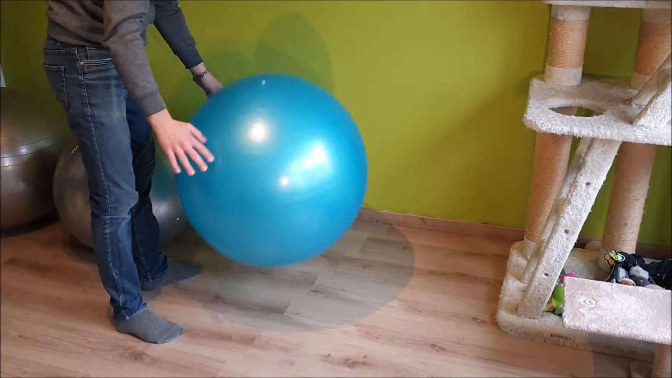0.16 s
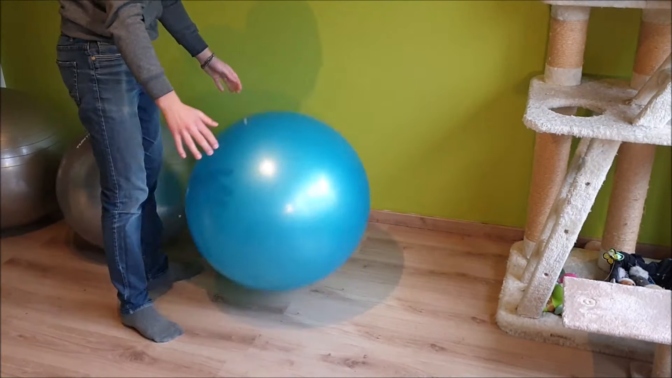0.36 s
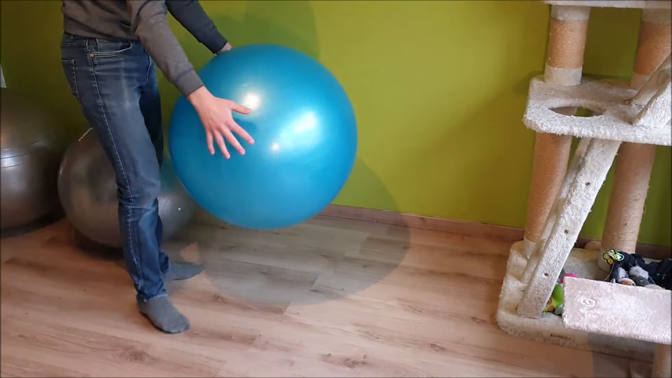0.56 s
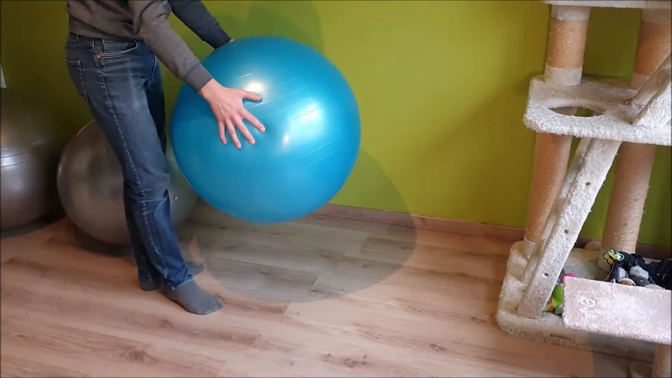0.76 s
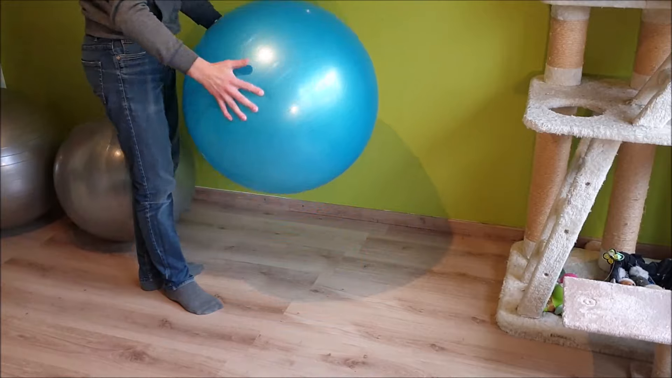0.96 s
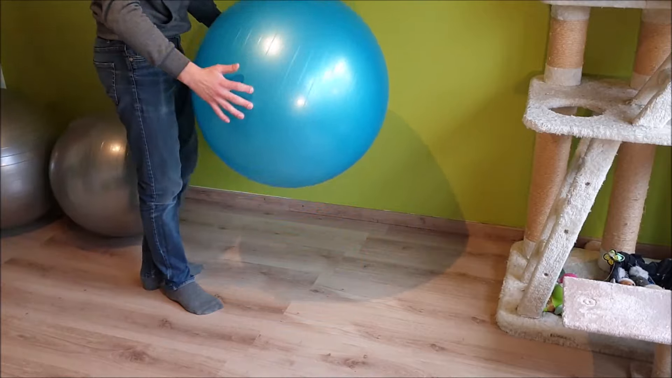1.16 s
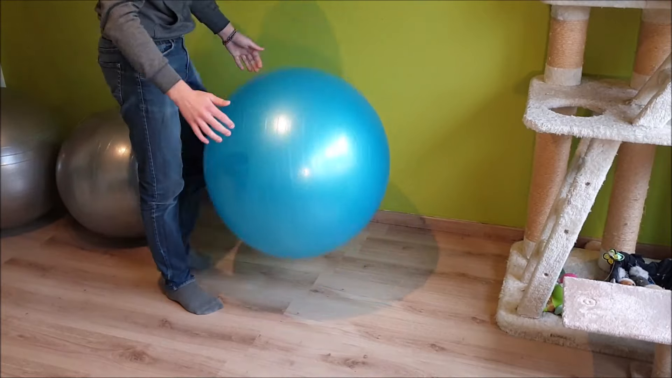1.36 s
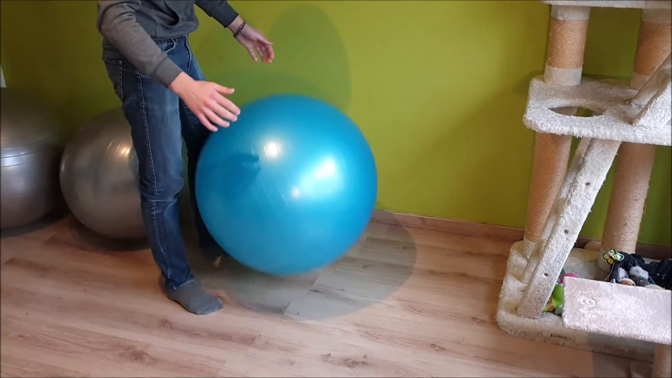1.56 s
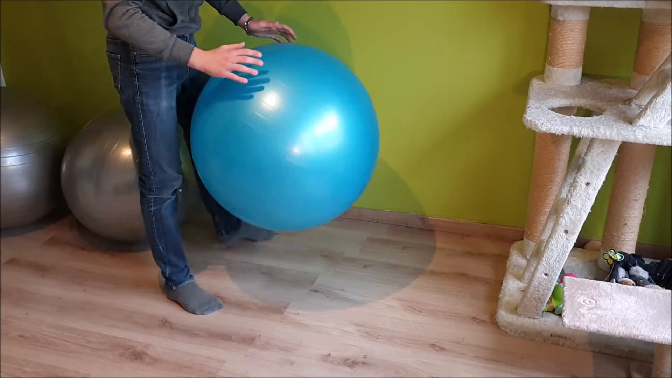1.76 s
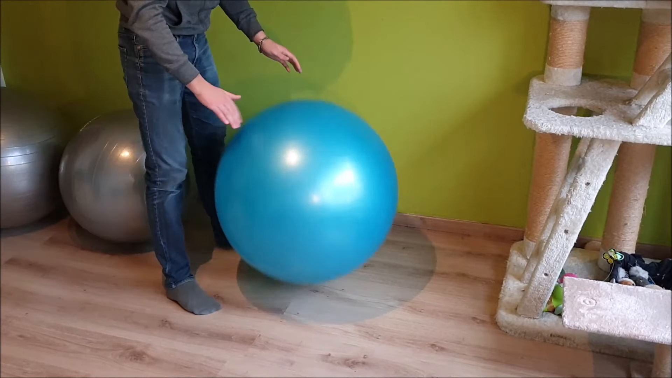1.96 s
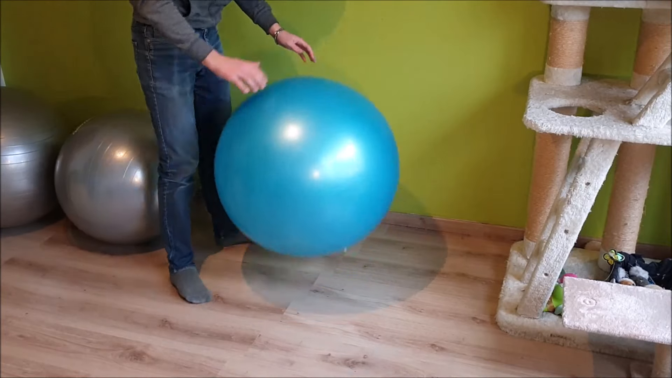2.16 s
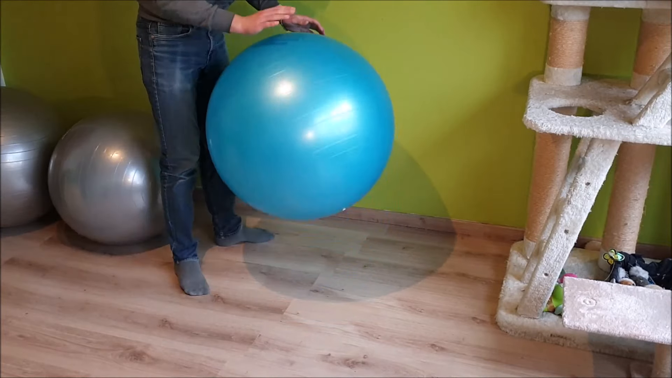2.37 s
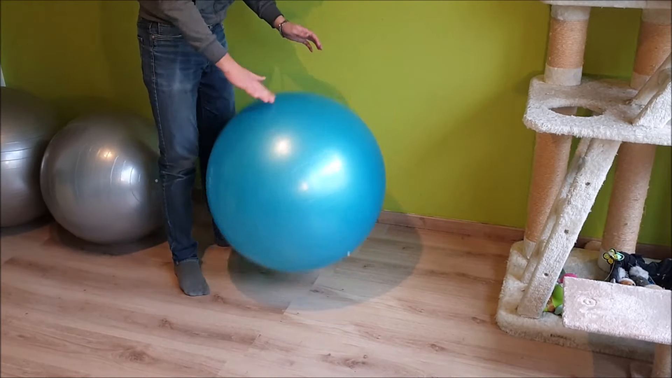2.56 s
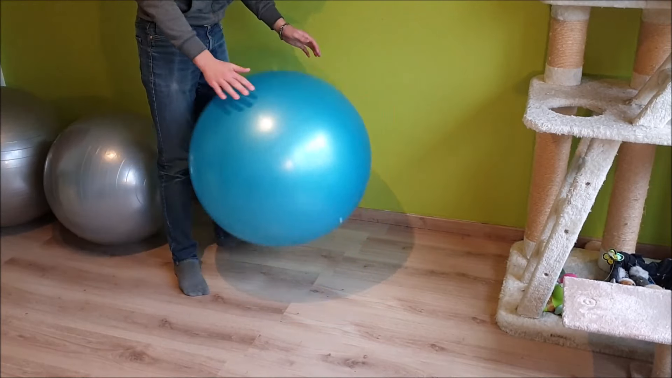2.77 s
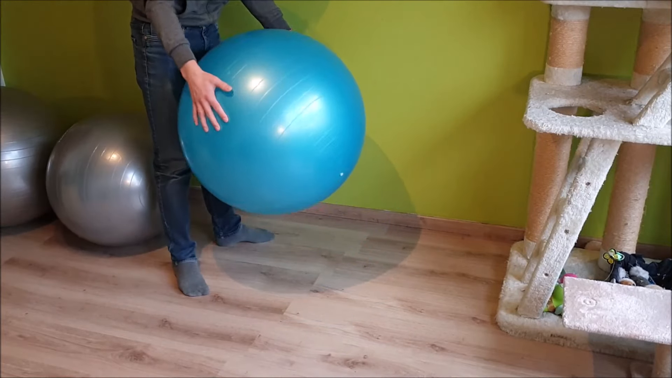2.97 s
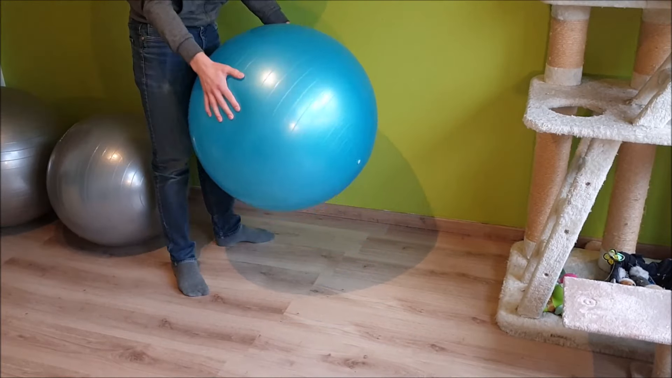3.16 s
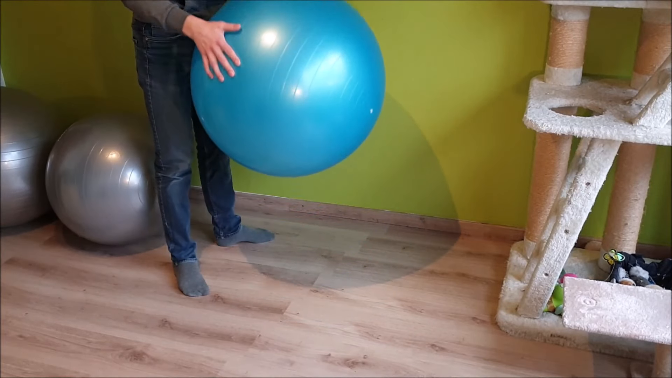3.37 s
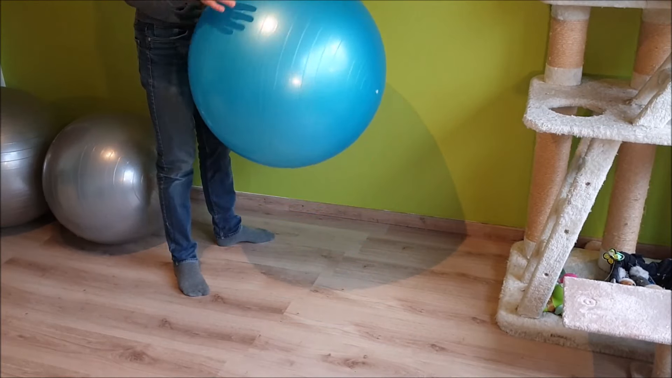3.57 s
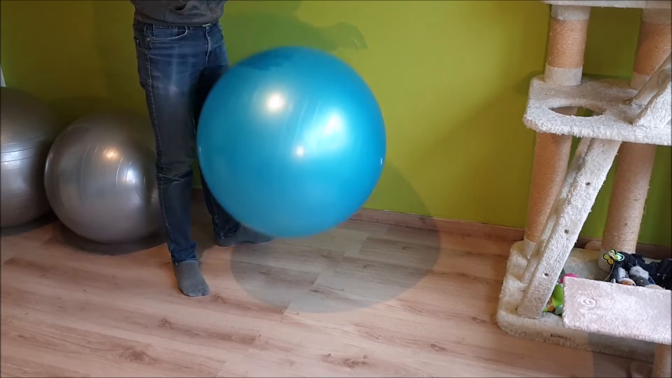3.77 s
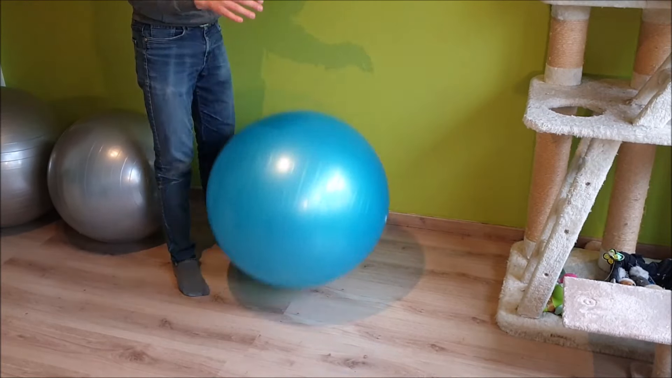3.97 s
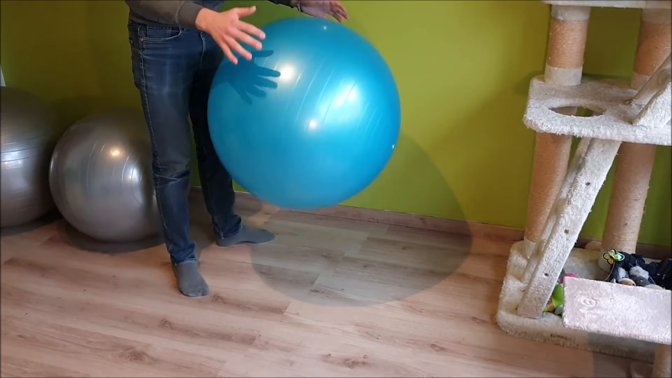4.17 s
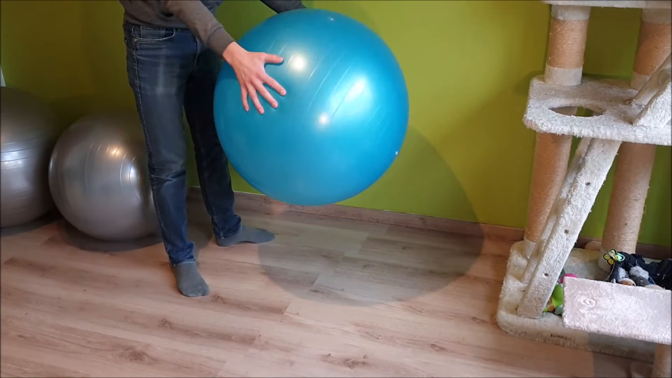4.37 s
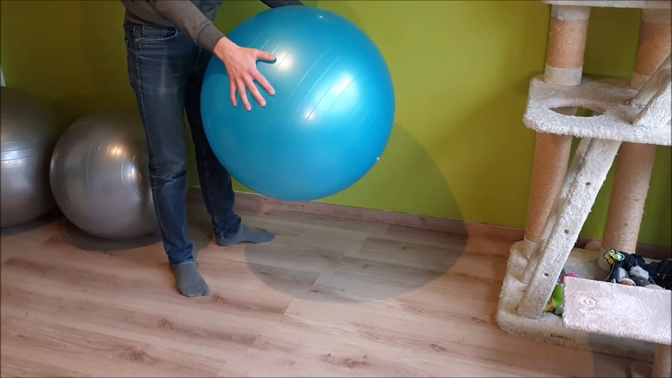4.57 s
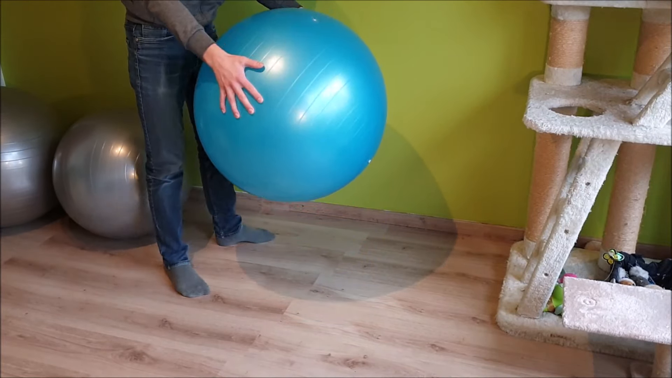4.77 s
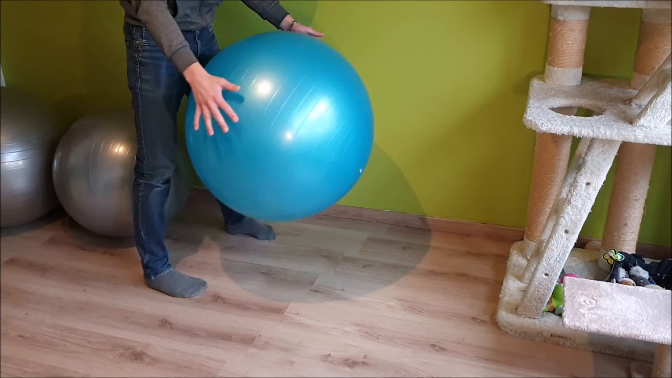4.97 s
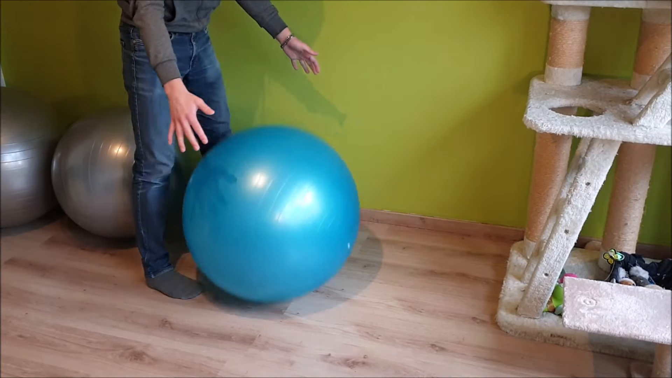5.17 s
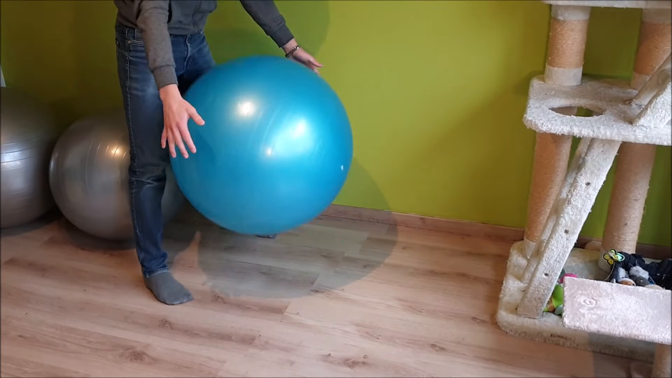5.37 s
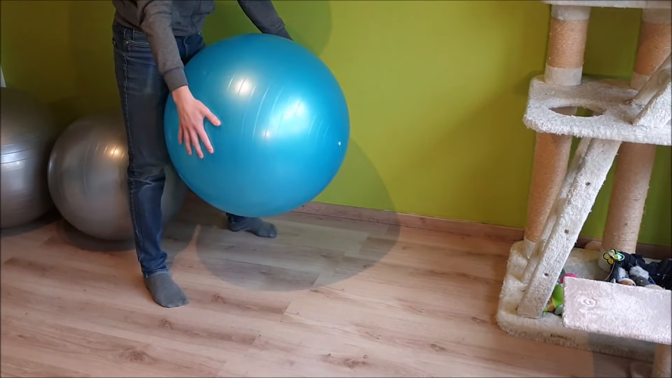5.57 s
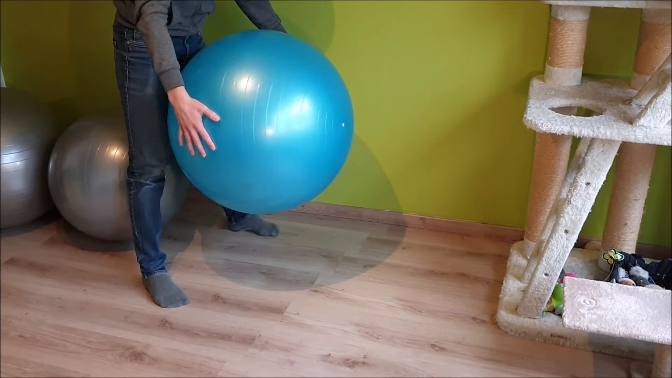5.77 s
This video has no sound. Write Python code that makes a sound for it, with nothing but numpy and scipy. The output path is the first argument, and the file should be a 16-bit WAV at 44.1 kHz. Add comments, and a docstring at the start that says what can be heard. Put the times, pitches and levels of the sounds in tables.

```python
"""A big inflated exercise ball bounces six times on a wooden floor in a small room, patted or caught in
between. Each impact displaces air, exciting the room's low modes (a boom) and the hollow body's modes
(a knock), while the rubber skin slaps the boards and the enclosed air rings on faintly. Hands land with
dull pats, then judder, hiss and groan over the rubber by stick-slip friction."""
import sys
import numpy as np
from scipy import signal
from scipy.fft import rfft, irfft, next_fast_len
from scipy.io import wavfile

SR = 44100
rng = np.random.default_rng(int(sys.argv[2]) if len(sys.argv) > 2 else 0)


def put_to_file(sound):
    """Save the sound as 16-bit audio at rate SR, in the file named by the first command-line argument."""
    columns = np.atleast_2d(sound).T  # one column per channel
    safe = np.clip(columns, -1, 1)
    whole_steps = np.round(safe * 32767)
    wavfile.write(sys.argv[1], SR, whole_steps.astype(np.int16))


N = 257103
TAIL = np.arange(int(1.5 * SR)) / SR  # time axis of an impulse response, in seconds

# Floor impacts. Each row: start and push length in seconds, then boom, knock, slap and crackle in dB.
FLOOR_IMPACTS = [(0.340, 0.016, -24, -36.5, 12.5, 1), (1.525, 0.021, -16, -30, 12, -1),
                 (2.077, 0.014, -20, -41.5, 17, 4.5), (2.679, 0.018, -19.5, -33.5, 15, 3),
                 (3.952, 0.015, -23.5, -29.5, 10.5, 3.5), (5.226, 0.015, -29.5, -33, 8, -1.5)]
# Single touches of the hands that toss, dribble or regrip the ball. Each row: start in seconds, then boom,
# knock and crackle in dB.
HAND_PATS = [(0.1, -47.5, -57, -28), (1.148, -51, -60, -40), (1.931, -36.5, -40, -31),
             (2.521, -51.5, -41.5, -19.5), (2.546, -40.5, -49, -57), (3.365, -54.5, -49.5, -45),
             (3.398, -37.5, -51.5, -37), (4.691, -46.5, -56, -52), (4.945, -50.5, -53.5, -52)]
# Two-handed catches. Each row: landing of the palms and stop of the ball in seconds,
# then landing boom, knock, stopping boom and skid judder in dB.
HAND_CATCHES = [(0.667, 0.75, -37, -44.5, -31.5, -34.5), (3.013, 3.133, -42.5, -45.5, -36.5, -37.5),
                (4.362, 4.421, -38, -38.5, -28, -31), (5.568, 5.626, -32, -44.5, -35.5, -36)]
# Shifts of grip. Each row: middle and length in seconds, judder in dB.
GRIP_SHIFTS = [(0.01, 0.034, -43), (0.161, 0.12, -44), (0.99, 0.55, -55), (1.264, 0.32, -51),
               (2.576, 0.11, -36), (3.487, 0.21, -47.5), (4.72, 0.18, -55.5)]
# Sleeves and dry hands brushing past. Each row: middle and length in seconds, swish and shrill in dB.
BRUSHES = [(0.11, 0.058, -60.5, -67), (0.292, 0.1, -64.5, -77), (0.586, 0.051, -59, -74),
           (1.241, 0.11, -68, -70), (3.042, 0.23, -67, -61.5), (3.787, 0.083, -63, -63),
           (4.883, 0.18, -71, -74), (5.002, 0.22, -54, -65.5), (5.6, 0.11, -67, -63.5)]
# Slips of a gripping palm. Each row: middle and length in seconds, slip rate in Hz, level in dB.
GRIP_SLIPS = [(0.796, 0.18, 210, -41.5), (3.083, 0.24, 205, -42), (4.429, 0.11, 235, -37),
              (4.729, .12, 194.8, -43.5), (5.631, 0.2, 210, -36)]

# Normal modes. Each row: frequency in Hz, level in dB, 60 dB decay time (t60) in seconds.
LOW_MODES = [(44.97, -5.5, 0.8), (55.9, -5.5, 0.46), (64.6, 5.5, 0.31), (73.54, 3, 0.3), (77.93, 6.5, 0.5),
             (85.9, -8, 0.88)]  # room and floor, with the ball's own squash mode near 65 Hz
BALL_MODES = [(129.4, -17.5, 1.13), (139, -1.5, 0.6), (153.5, -17.5, 0.94), (177.1, -10, 0.59),
              (205.4, -4.5, 0.68), (215.4, -8.5, 0.69), (241.8, -2.5, 0.44), (259.5, -2, 0.49),
              (284.7, -5.5, 0.59), (311.2, -1, 0.47), (404, -3.5, 0.57), (431, -3, 0.43), (474, -3.5, 0.32),
              (493, -12, 0.58), (612, -4, 0.43), (690, -5, 0.32), (785, -24, 0.058), (808.5, -5.5, 0.43),
              (913, 2, 0.077), (994, -14, 0.68), (1015, -7, 0.16), (1166, -5.5, 0.38), (1310, -20, 0.28),
              (1530, -32, 0.71), (1940, -27, 0.42), (3180, -30.5, 0.36)]  # hollow ball and the room around it

# Spectra. Each row: frequency in Hz, level in dB.
BACKGROUND_SPECTRUM = [(20, 4.5), (45, 4.5), (80, -8), (130, -17), (400, -16.5), (900, -42), (1900, -27),
                       (3500, -40), (7000, -29), (8500, -43), (11000, -34), (16000, -35.5)]
JUDDER_SPECTRUM = [(40, -22), (80, 15), (105, 1), (150, 3), (250, -2.5), (360, -8), (480, -14), (900, -20),
                   (1800, -25), (4000, -33.5), (9000, -54)]
SWISH_SPECTRUM = [(300, -20), (900, 4), (2000, -5), (4000, 3.5), (7000, 2), (8500, -6), (16000, -6)]
SHRILL_SPECTRUM = [(2000, -42), (6500, 2), (8500, -9.5), (10500, 6), (14000, 2), (16000, 2.5)]
PAT_SPECTRUM = [(60, -14.5), (140, 13.5), (260, 2), (450, -1), (800, -14), (1500, -17.5), (3000, -36.5),
                (8000, -70)]
CRACKLE_SPECTRUM = [(300, 10), (1000, 6), (1800, -14.5), (3000, 2), (5000, 2.5), (7000, 4), (8300, -6.5),
                    (10300, -1.5), (13500, -3), (16000, -14)]
SLAP_SPECTRUM = [(70, -33.5), (130, 1), (300, 5), (360, -22), (440, 5.5), (560, -8), (1000, -5),
                 (1500, -8.5), (2500, -9.5), (6000, -22), (16000, -43)]
CAVITY_SPECTRUM = [(500, -42), (1200, -29.5), (1700, -26), (2600, -27), (4500, -14), (7000, -15.5),
                   (8500, -21), (16000, -45)]

# Reverberation of the room and of the air in the ball. Each row: frequency in Hz, t60 in seconds.
ROOM_DECAY = [(100, 0.44), (300, 0.4), (800, 0.43), (2000, 0.49), (5000, 0.4), (8000, 0.35), (14000, 0.31)]
CAVITY_DECAY = [(1000, 1.2), (1800, 11), (3200, 1.72), (7000, 0.9)]
# Likeness of the room's sound at the two microphones. Each row: frequency in Hz, correlation.
COHERENCE = [(100, 0.81), (250, 0.99), (550, 0.46), (1200, 0.071), (8000, 0)]


def undb(db):
    """Amplitude ratio of a level in decibels."""
    return 10 ** (np.asarray(db) / 20)


def along(points, hz):
    """Interpolation of (Hz, value) points on a log-frequency axis."""
    f, value = np.transpose(points)
    return np.interp(np.log(np.maximum(hz, 1)), np.log(f), value)


def fade(t60):
    """Exponential damping: 60 dB in t60 seconds."""
    return np.exp(-np.log(1000) * TAIL / t60)


def hump(middle_s, length_s):
    """A half-cosine swell."""
    return np.cos(np.pi * np.clip((np.arange(N) / SR - middle_s) / length_s, -.5, .5))


def wander(rate_hz):
    """Random modulation: a line through rate_hz new values a second."""
    return np.interp(np.arange(N) / SR * rate_hz, np.arange(N), rng.standard_normal(N))


def pan(left_db):
    """Stereo gains that place a source by its level lead on the left."""
    return undb(np.array([[left_db], [-left_db]]) / 2)


def add(track, start_s, x):
    """Superposition of x on the track."""
    i = max(int(start_s * SR), 0)
    track[..., i:i + x.shape[-1]] += x[..., :N - i]


def through(x, response):
    """Convolution with an impulse response, mono or stereo."""
    return signal.fftconvolve(np.atleast_2d(x), np.atleast_2d(response), axes=1)[:, :N]


def colour(x, spectrum, size=8192):
    """Minimum-phase filtering: folding the cepstrum makes the response causal."""
    gain = undb(along(spectrum, np.fft.rfftfreq(size, 1 / SR)))
    cepstrum = irfft(np.log(gain))
    cepstrum[1:size // 2] *= 2
    cepstrum[size // 2 + 1:] = 0
    return np.squeeze(through(x, irfft(np.exp(rfft(cepstrum)))))


def coherent_pair(size):
    """Spatial coherence: two white-noise spectra, alike in the bass and unrelated in the treble."""
    mid, side = rfft(rng.standard_normal((2, size)))
    alike = np.clip(along(COHERENCE, np.fft.rfftfreq(size, 1 / SR)), -1, 1)
    return mid * np.sqrt(1 + alike) + side * np.sqrt(1 - alike) * np.array([[1], [-1]])


def noise(spectrum):
    """Coloured stereo noise of rms 1."""
    white = irfft(coherent_pair(next_fast_len(N + 1)))[:, :N]
    x = colour(white, spectrum)
    return x / x.std()


def unit(x):
    """Normalisation to an energy of 1."""
    return x / np.sqrt(np.sum(x ** 2, axis=-1, keepdims=True))


def diffuse(decays, build_s, size=32768):
    """A diffuse field: countless random reflections, each band dying at its own rate."""
    log_hz = np.log(np.fft.rfftfreq(size, 1 / SR) + 1)
    field = coherent_pair(size)
    centres = np.log([hz for hz, _ in decays])
    out = 0
    for share, (_, t60) in zip(np.eye(len(centres)), decays):
        band = irfft(field * np.interp(log_hz, centres, share))
        out = out + band * fade(t60)[:size]
    return unit(out * (1 - np.exp(-TAIL[:size] / build_s)))


def room(direct, build_s):
    """Direct sound plus reverberation; the shorter path reaches the left microphone first."""
    lag_samples = 5
    tail = diffuse(ROOM_DECAY, build_s)
    size = tail.shape[1]
    left = np.pad(direct, (0, size))
    right = np.pad(left, (lag_samples, 0))
    return np.array([left[:size], right[:size]]) + tail


def ring(modes, rise_s, spread, flip):
    """Standing waves build up and decay; a negative flip sets neighbouring modes in opposite phase."""
    out = 0
    for k, (hz, db, t60) in enumerate(modes):
        # higher modes lie further apart in phase at the two microphones
        phase = np.array([[1], [-1]]) * min(spread * hz / 1000, 1) * (-1) ** (k // 2)
        out = out + flip ** k * undb(db) * fade(t60) * np.sin(2 * np.pi * hz * TAIL + phase)
    return out * (1 - np.exp(-TAIL / rise_s))


def sliding(skid_lead_s=0.023, skid_overrun_s=0.042):
    """Strength of sliding friction: small shifts of grip, and a skid through each catch."""
    slide = sum(undb(db) * hump(s, length) for s, length, db in GRIP_SHIFTS)
    for land_s, stop_s, *_, judder_db in HAND_CATCHES:
        start, end = land_s - skid_lead_s, stop_s + skid_overrun_s
        slide = slide + undb(judder_db) * hump((start + end) / 2, end - start)
    return slide


def rubbing(uneven_db=3, slip_hz=86.5, linger_t60=0.34):
    """Friction noise: uneven slips make the skin judder, while palms and sleeves hiss."""
    slide = sliding()
    sleeves = sum(undb(levels)[:, None] * hump(s, length) for s, length, *levels in BRUSHES)
    palms = undb([-29, -31.5])[:, None] * slide  # swish, shrill hiss
    slips = undb(uneven_db * wander(slip_hz))
    judder = slide * slips * noise(JUDDER_SPECTRUM)[0]
    hiss_power = (np.hypot(palms, sleeves) * slips) ** 2
    # the hiss lingers in the room behind each slip
    lingering = np.abs(through(hiss_power, unit(fade(linger_t60)) ** 2))
    swish, shrill = np.sqrt(0.42 * hiss_power + lingering)
    return judder, swish * noise(SWISH_SPECTRUM) + shrill * noise(SHRILL_SPECTRUM)


def ball_body(floor_knock, hand_knock, judder):
    """Forced vibration: knocks and the juddering skin drive the modes of the hollow ball."""
    force = floor_knock + undb(-1) * hand_knock + undb(-58) * judder
    return through(force, ring(BALL_MODES, rise_s=0.033, spread=0.85, flip=-0.983))


def touches(push_s=0.013, stop_push_s=0.01, finger_lead_s=0.02):
    """Soft impacts. Each row: start and push length in seconds, then boom, knock and crackle in dB."""
    no_crackle = -np.inf  # flat palms land without crackling
    rows = [(s, push_s, *levels) for s, *levels in HAND_PATS]
    for land_s, stop_s, boom_db, knock_db, stop_db, _ in HAND_CATCHES:
        rows += [(land_s - finger_lead_s, push_s, boom_db - 6, knock_db - 6, -33),  # fingertips
                 (land_s, push_s, boom_db, knock_db, no_crackle),  # palms
                 (stop_s, stop_push_s, stop_db, knock_db - 3, no_crackle)]  # the ball stops
    return rows


def blows(impacts):
    """Elastic impact: the ball flattens and springs back, giving one pressure cycle and a knock."""
    push, knock = np.zeros((2, N))
    for s, push_s, boom_db, knock_db, *_ in impacts:
        n = int(push_s * SR)
        add(push, s, undb(boom_db) * np.sin(2 * np.pi * np.arange(n) / n) * 2 / n)
        add(knock, s, undb([knock_db]))
    return push, knock


def room_boom(floor_push, hand_push, notch_hz=95.6, notch_width_hz=31):
    """Low resonance: displaced air excites the room's low modes, and the ball's squash mode heaves; a notch
    trims the boom's upper edge."""
    # hands that hold the ball stop its boom sooner
    held_modes = [(hz, db + 7, 0.77 * t60) for hz, db, t60 in LOW_MODES]
    free = through(floor_push, ring(LOW_MODES, rise_s=0.019, spread=0.49, flip=0.92))
    held = through(hand_push, ring(held_modes, rise_s=0.016, spread=0.6, flip=0.97))
    notch = signal.iirnotch(notch_hz, notch_hz / notch_width_hz, fs=SR)
    return signal.lfilter(*notch, free + held)


def crackle(rise_s, t60, grain_db):
    """Contact noise: rubber meets a surface in many tiny snaps as the contact patch spreads."""
    snaps = rng.standard_normal(len(TAIL)) * undb(grain_db * rng.standard_normal(len(TAIL)))
    return unit(snaps * (1 - np.exp(-TAIL / rise_s)) * fade(t60))


def pats(pat_gain_db=45.5):
    """Compliant contact: soft palms give a dull pat, in proportion to the knock, and a light crackle."""
    pat, skin = np.zeros((2, N))
    for s, _, _, knock_db, skin_db in touches():
        add(pat, s, undb(knock_db + pat_gain_db) * crackle(rise_s=0.0044, t60=0.19, grain_db=2.5))
        add(skin, s, undb(skin_db) * crackle(rise_s=0.0018, t60=0.12, grain_db=-3.5))
    return colour(pat, PAT_SPECTRUM) + colour(skin, CRACKLE_SPECTRUM)


def landings():
    """Hard contact: the skin slaps and crackles on the boards, each spot with its own reflections."""
    slap, skin = np.zeros((2, N)), np.zeros((2, N))
    for s, *_, slap_db, skin_db in FLOOR_IMPACTS:
        smack = undb(-8) * crackle(rise_s=0.001, t60=0.094, grain_db=3.5)
        add(slap, s, undb(slap_db) * room(smack, build_s=0.0058))
        snaps = undb(-6) * crackle(rise_s=0.00091, t60=0.29, grain_db=11)
        add(skin, s, undb(skin_db) * room(snaps, build_s=0.0064))
    return colour(slap, SLAP_SPECTRUM) * pan(3.9) + colour(skin, CRACKLE_SPECTRUM) * pan(5.5)


def cavity_ping():
    """Cavity resonance: each landing jolts the enclosed air into a dense, faint ring."""
    jolts = np.zeros(N)
    for s, *_, skin_db in FLOOR_IMPACTS:
        add(jolts, s, undb([skin_db]))
    return through(colour(jolts, CAVITY_SPECTRUM), diffuse(CAVITY_DECAY, build_s=0.0053, size=65536))


def groans(jitter=0.1, uneven_db=3, other_palm_ratio=0.68):
    """Stick-slip oscillation: two gripping palms give rough low tones of unsteady rate and strength."""
    clock = np.cumsum(1 + jitter * wander(70)) / SR
    out = 0
    for s, length, hz, db in GRIP_SLIPS:
        phase = 2 * np.pi * hz * clock
        palm = np.sin(phase) + undb(-14) * np.sin(2 * phase)
        slower_palm = undb(-0.5) * np.sin(other_palm_ratio * phase)
        out = out + undb(db) * hump(s, length) * (palm + slower_palm)
    return out * undb(uneven_db * wander(60))


def scene():
    """Superposition of ball, hands and room over a faint steady background."""
    floor_push, floor_knock = blows(FLOOR_IMPACTS)
    hand_push, hand_knock = blows(touches())
    judder, hiss = rubbing()
    body = ball_body(floor_knock, hand_knock, judder) * pan(2.3)
    walls = room(undb([-5]), build_s=0.001)
    hands = through(undb(-1) * pats() + undb(-3.5) * judder, walls) * pan(4.2) + hiss * pan(8)
    deep = room_boom(floor_push, hand_push) + groans()
    background = undb(-61) * noise(BACKGROUND_SPECTRUM)
    return (deep + background) * pan(2.1) + body + hands + landings() + cavity_ping() * pan(3.9)


def record(dry, low_cut_hz=45.4, top_hz=16000):
    """Band limiting: filters remove the deepest rumble and the highest treble."""
    dry = signal.sosfilt(signal.butter(2, low_cut_hz, "highpass", fs=SR, output="sos"), dry)
    return signal.sosfilt(signal.ellip(10, .2, 80, top_hz, fs=SR, output="sos"), dry)


dry = scene()
out = record(dry)
put_to_file(out)
```